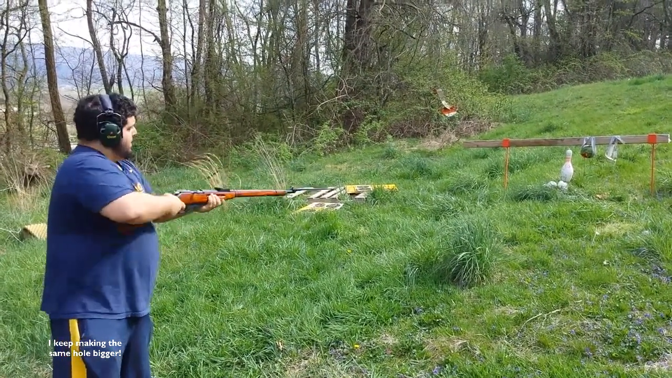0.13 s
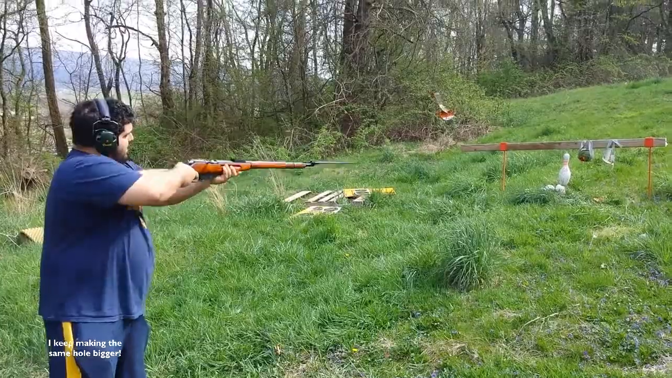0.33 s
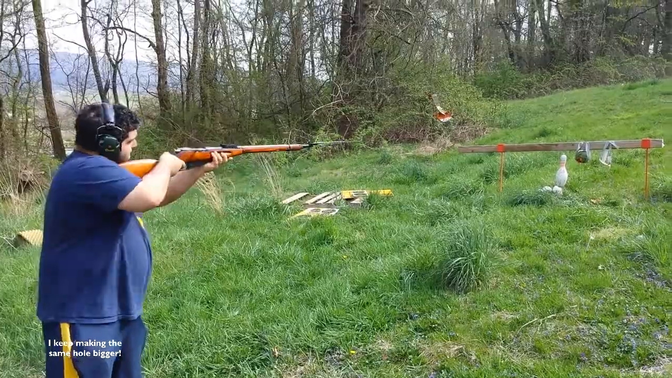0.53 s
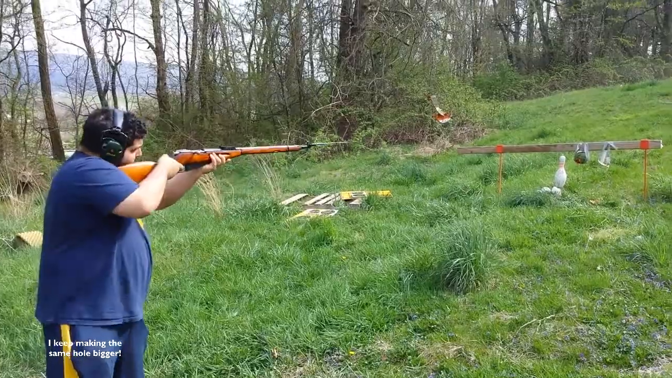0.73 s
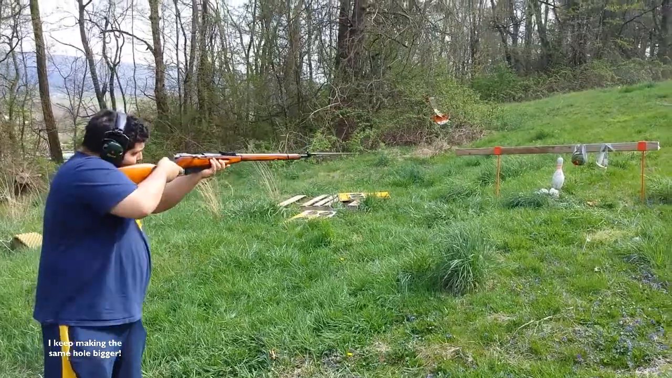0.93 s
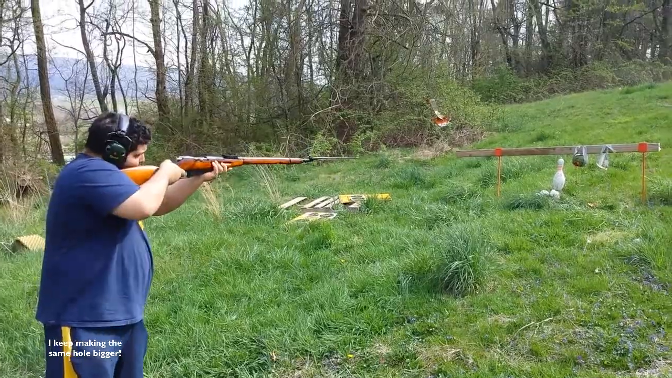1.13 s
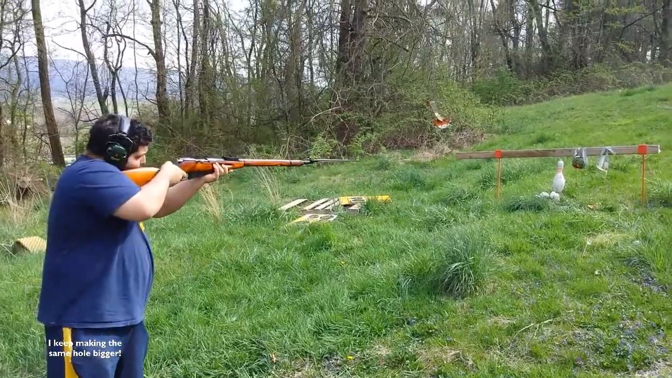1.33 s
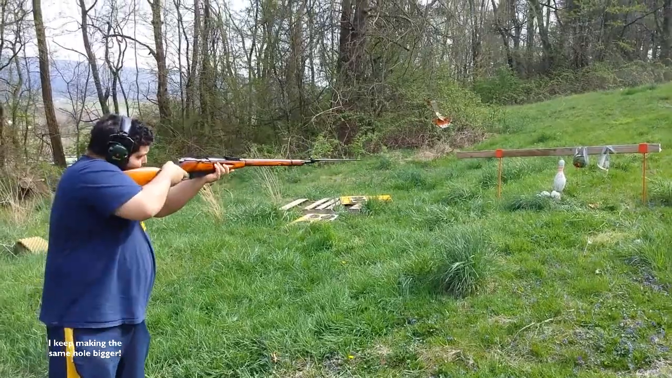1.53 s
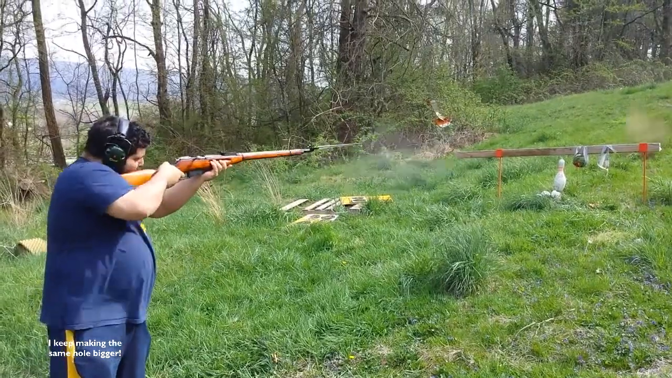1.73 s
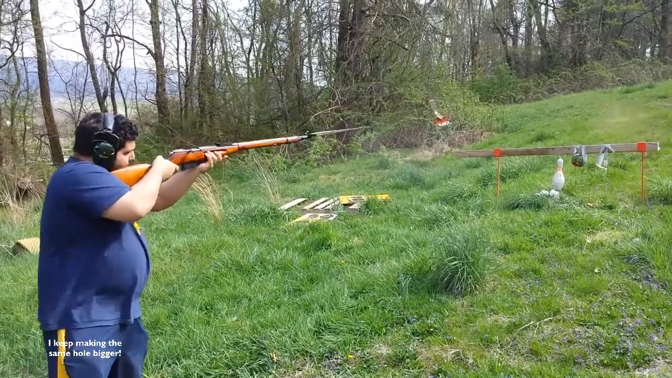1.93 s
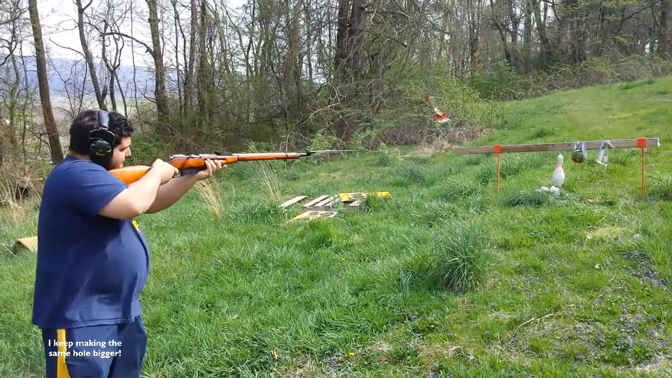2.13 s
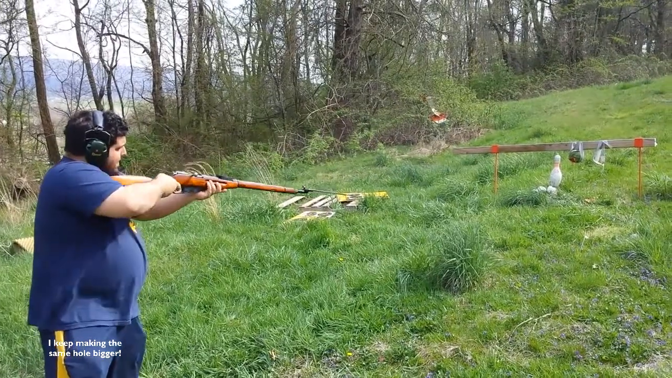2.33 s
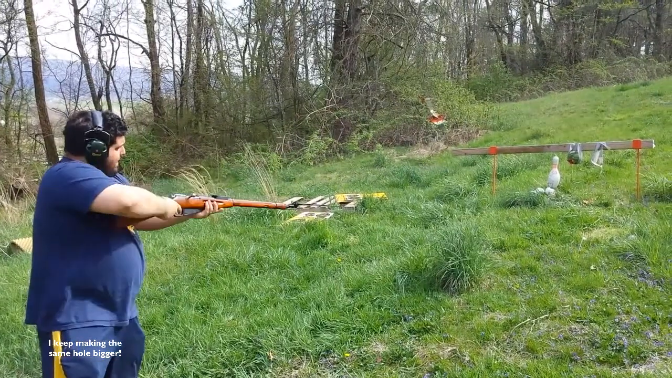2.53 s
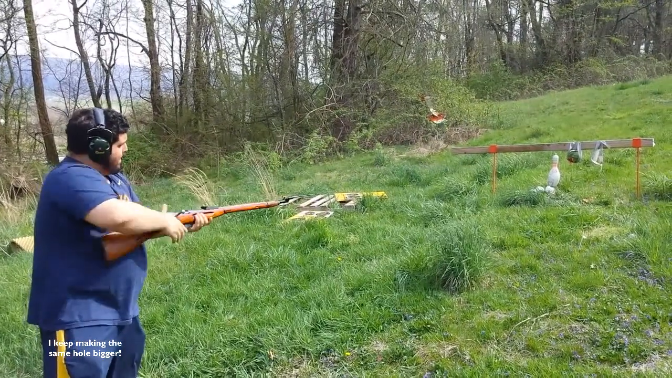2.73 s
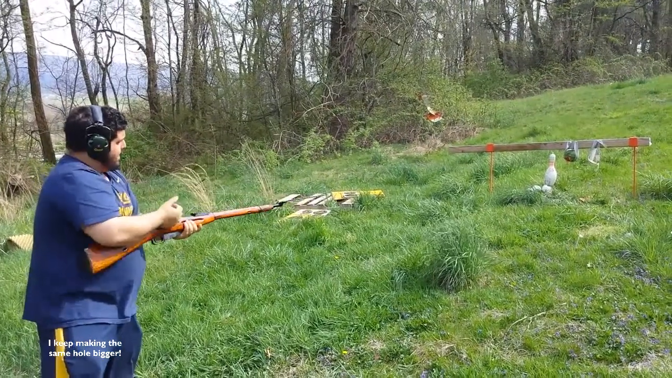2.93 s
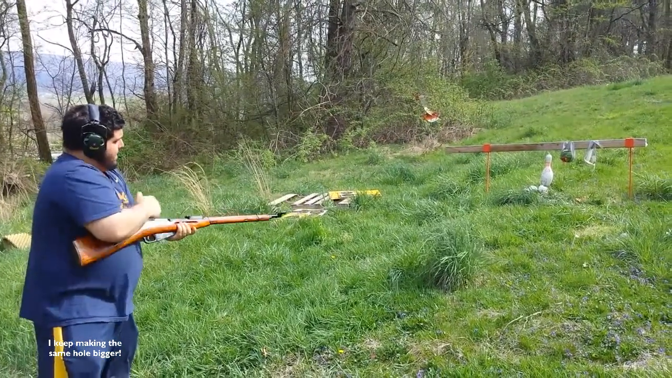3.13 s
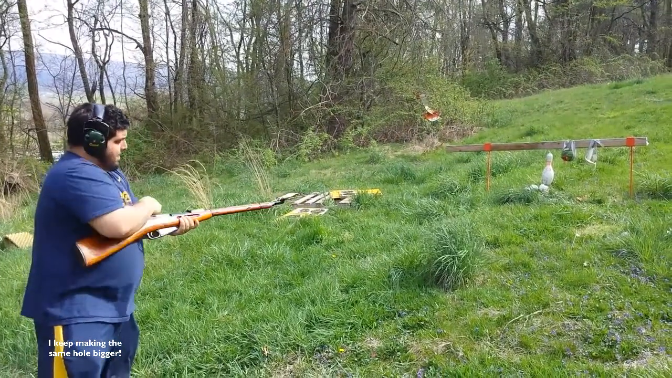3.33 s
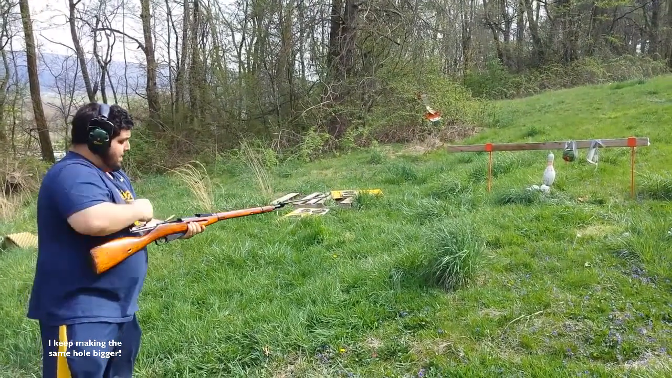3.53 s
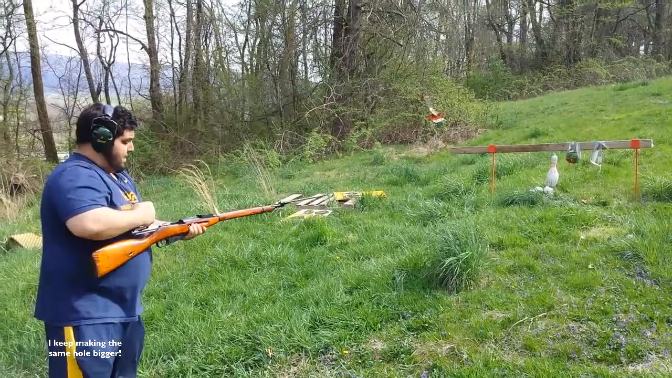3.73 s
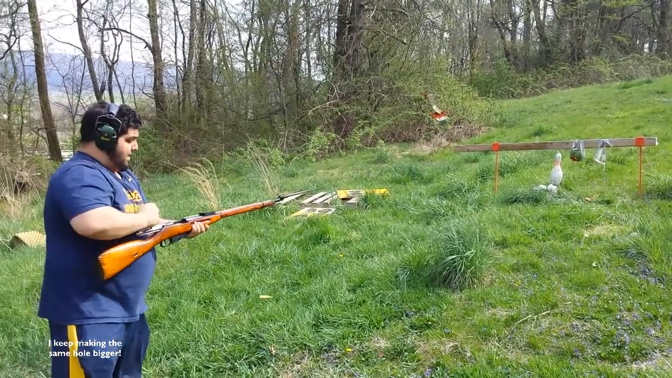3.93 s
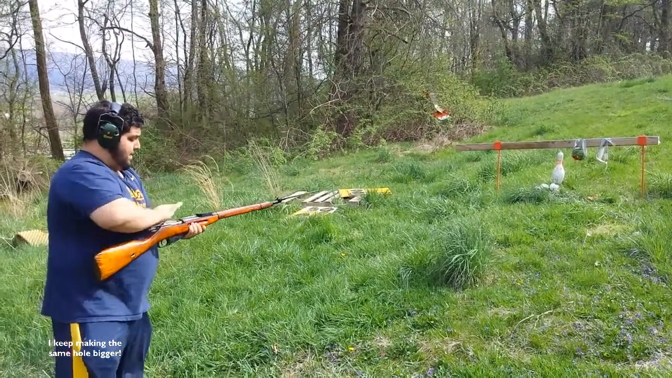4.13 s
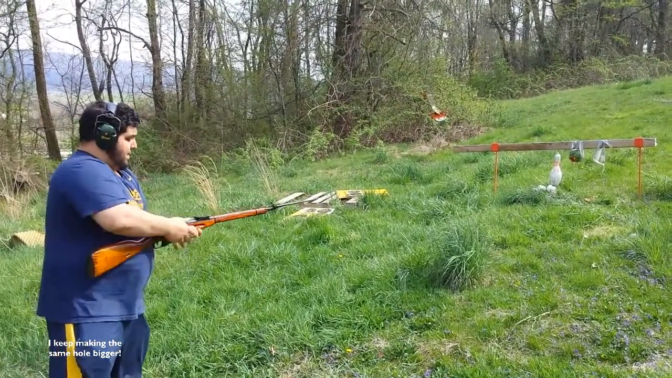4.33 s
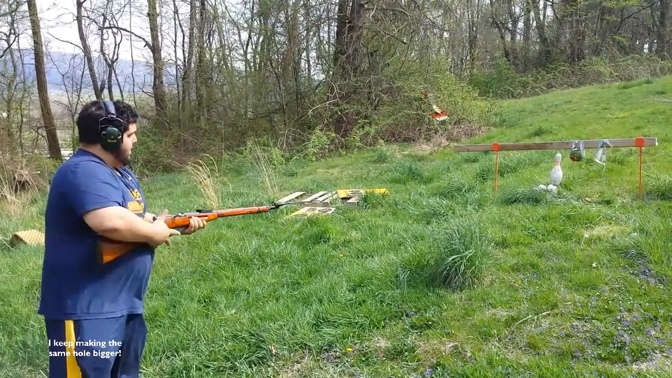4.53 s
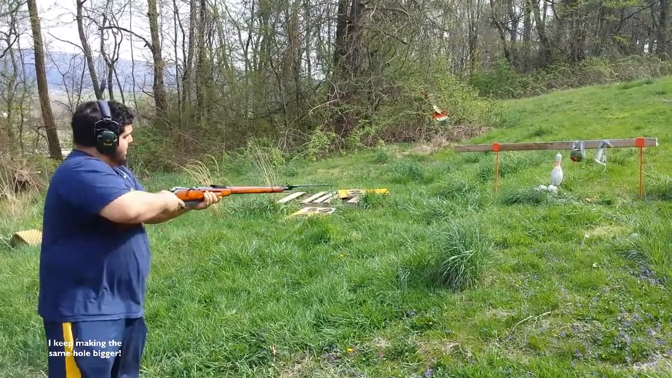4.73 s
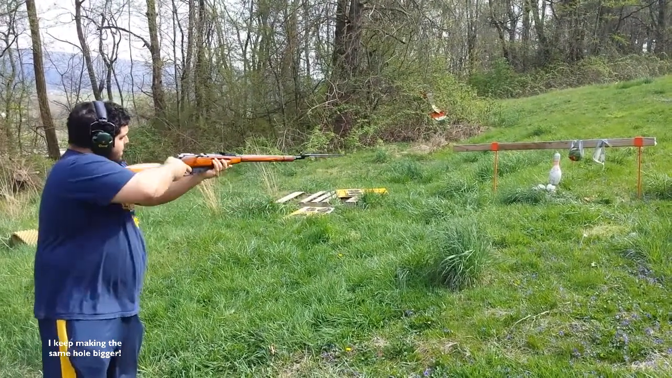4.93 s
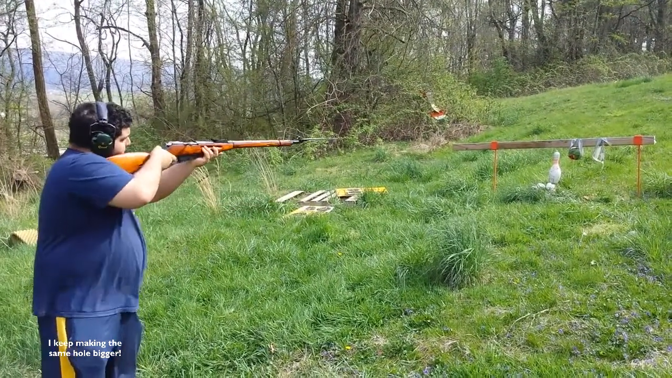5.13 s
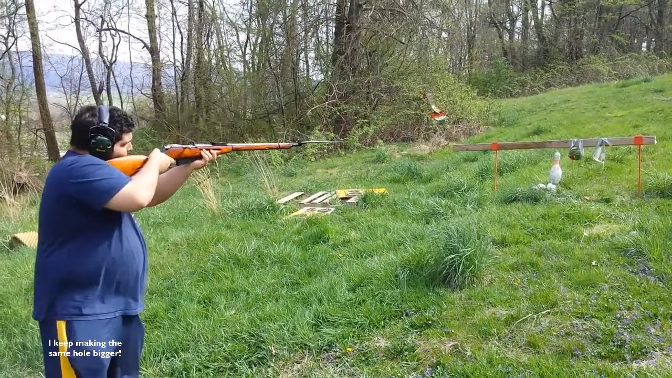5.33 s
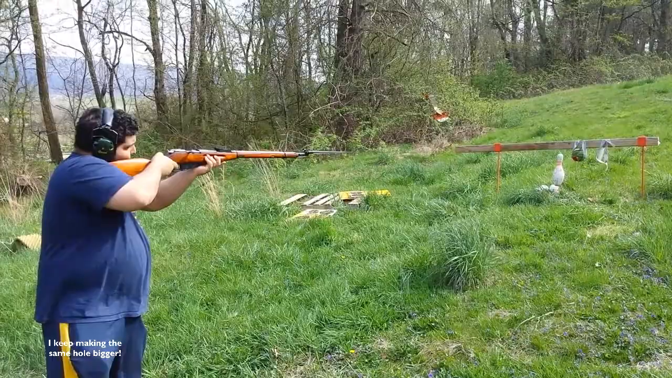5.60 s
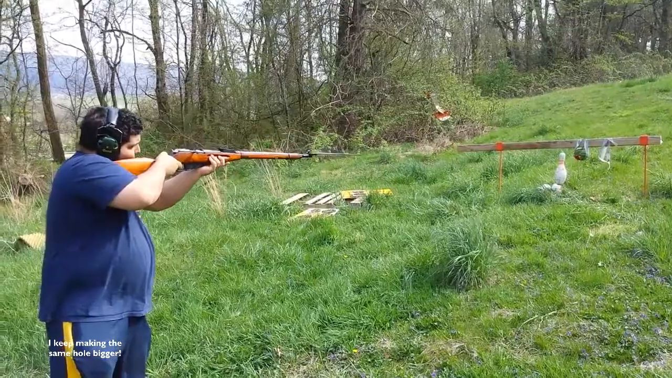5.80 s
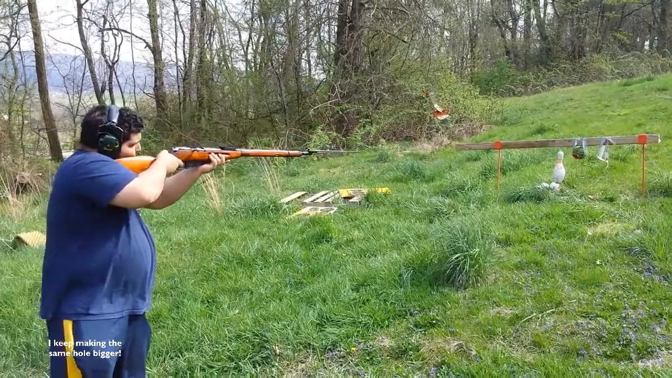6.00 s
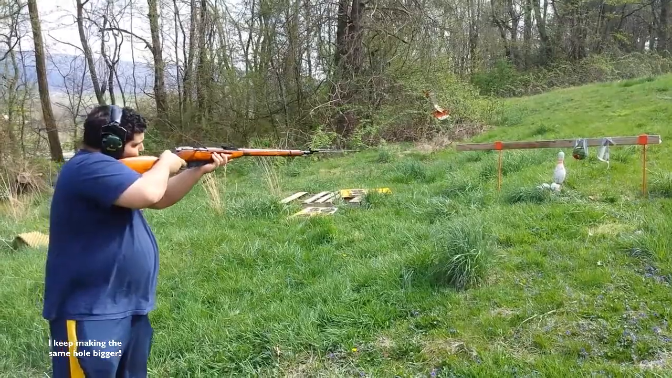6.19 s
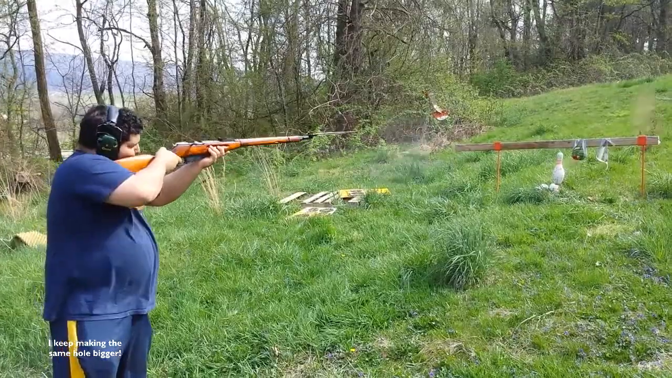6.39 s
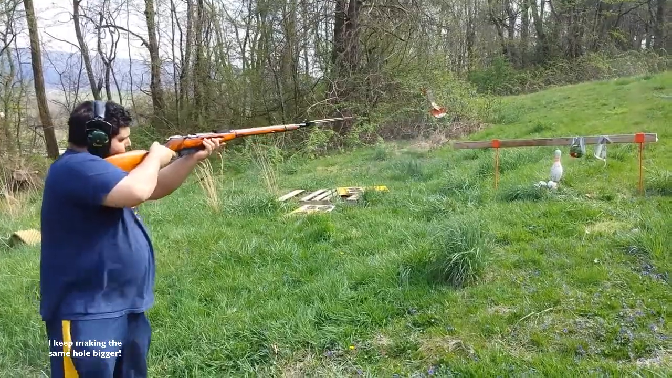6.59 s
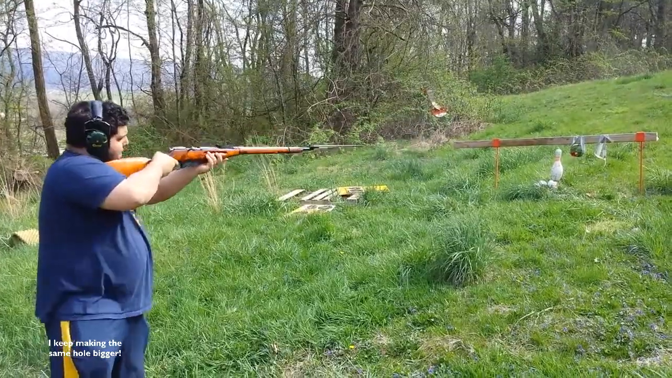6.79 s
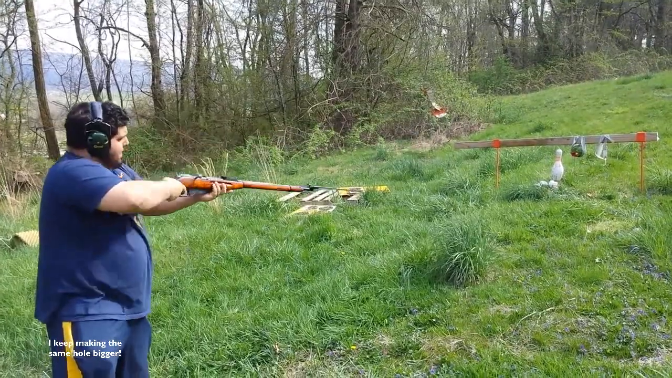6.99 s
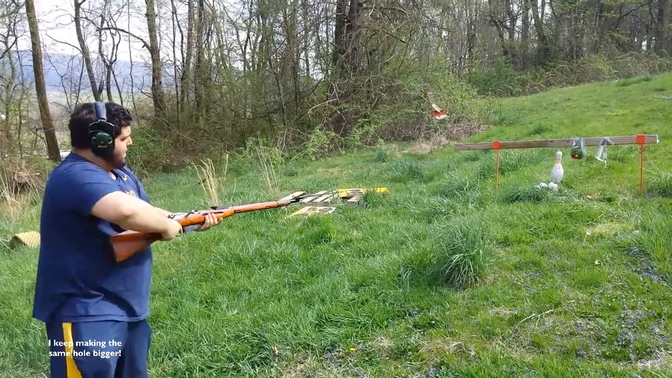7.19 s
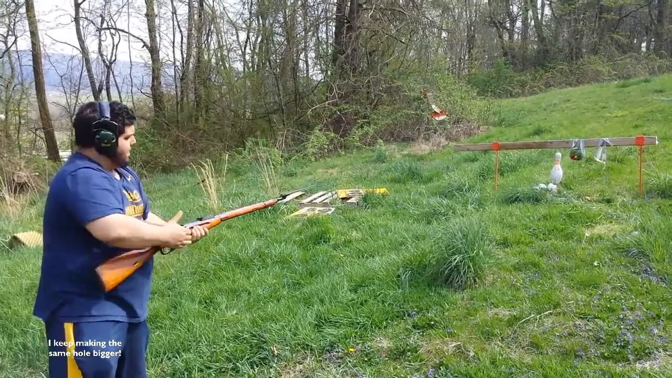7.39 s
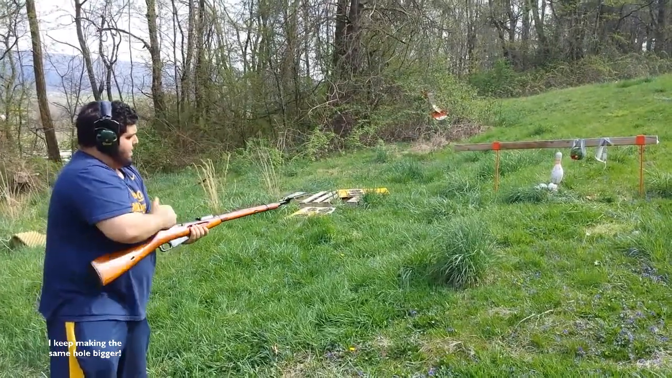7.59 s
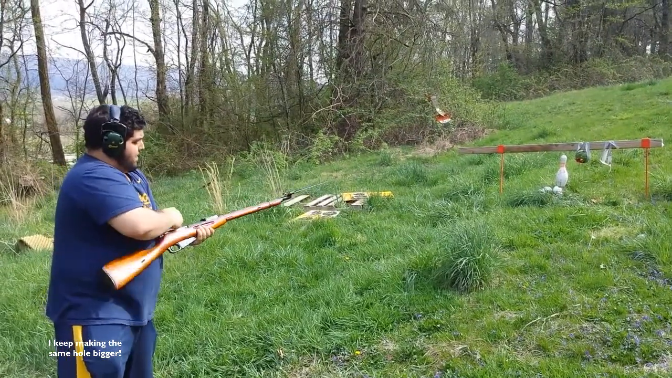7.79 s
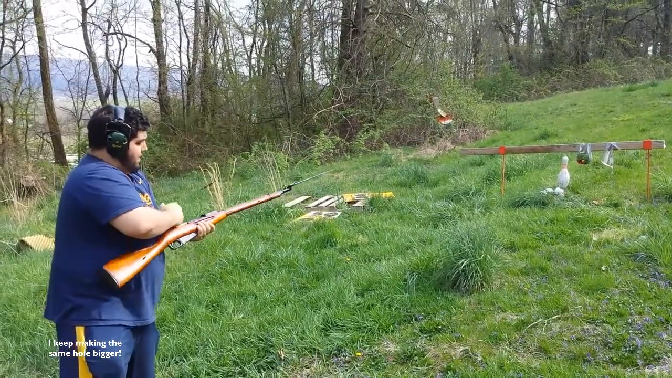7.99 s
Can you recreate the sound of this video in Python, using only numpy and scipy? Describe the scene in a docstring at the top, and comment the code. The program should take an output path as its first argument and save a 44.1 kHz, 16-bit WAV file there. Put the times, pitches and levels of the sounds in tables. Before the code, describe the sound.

A phone near the shooter picks up a dim outdoor hush and tiny birds, then a sudden overloaded gunshot, its echo knocking back from tree trunks and fading. The background is pushed down and slowly returns. Steel clacks and short scrapes of the bolt come in two quick groups, with faint ringing of an empty case and low gusts of wind. After a calm pause, another shot bursts and reverberates, then soft handling clicks and a cloth rub.

```python
"""Two rifle shots beside a wood

Two shots from a bolt-action rifle ring out on a meadow, a few metres from a phone.
Each blast is shaped noise with a low thump; decaying noise and knocks bring it back from the trees.
Steel blows and scrapes are the bolt, ringing sines the spent brass case, gliding whistles small birds.
Noise makes the distant hush and rush, and the wind that buffets the microphone.
The phone's gain sinks at loud sounds and slowly returns; its limiter flattens the blasts."""
import sys
import numpy as np
from scipy import signal
from scipy.fft import rfft, irfft, next_fast_len
from scipy.io import wavfile
from scipy.ndimage import uniform_filter1d, minimum_filter1d

SR = 44100
rng = np.random.default_rng(int(sys.argv[2]) if len(sys.argv) > 2 else 0)


def wav_record(signal):
    """Record a signal, one row per channel, as 16-bit PCM in the file named by sys.argv[1]."""
    frames = np.transpose(np.atleast_2d(signal))
    bounded = np.clip(frames, -1, 1)
    # unit amplitude maps onto the largest positive 16-bit level
    quanta = np.round(bounded * 32767).astype(np.int16)
    wavfile.write(sys.argv[1], SR, quanta)


N = 353593
TIME = np.arange(N) / SR

# spectrum of metal knocks and scrapes: f/Hz, level/dB
METAL_COLOUR = [(200, -29), (500, -19.5), (750, -7), (1500, -4.5), (2800, 2.5), (4200, 0.5), (6200, 8),
                (8000, 1.5), (11000, -8.5), (15000, -25)]


def undb(db):
    """Decibels to gain."""
    return 10 ** (np.asarray(db) / 20)


def curve(rows, at):
    """Each column of a table, joined by straight lines."""
    x, *columns = np.transpose(rows)
    return [np.interp(at, x, c) for c in columns]


def over_pitch(rows, hz):
    """Each column of a table, joined on a log-frequency axis."""
    log_rows = [(np.log(r[0]), *r[1:]) for r in rows]
    return curve(log_rows, np.log(hz + 1))


def clock(seconds):
    """Sample times of a short sound."""
    return np.arange(int(seconds * SR)) / SR


def add(out, start, sound):
    """Mix a sound in at a time."""
    i = int(start * SR)
    out[:, i:i + sound.shape[-1]] += sound[..., :N - i]


def sides(db):
    """Left and right gains for a level difference."""
    return undb(np.array([db, -db]) / 2)


def colour(x, points, tilt_db=0):
    """Shape white noise to a spectrum, tilted in dB per octave, keeping its power."""
    hz = np.linspace(0, SR / 2, x.shape[-1] // 2 + 1)
    gain = undb(over_pitch(points, hz)[0] + tilt_db * np.log2(hz + 1))
    level = np.sqrt(np.mean(gain ** 2))
    return irfft(rfft(x) * gain / level, x.shape[-1])


def air_noise(size):
    """White noise at the two microphone ports: alike in the bass, unrelated in the treble."""
    # the two ports: f/Hz, left minus right/dB, likeness (0-1)
    port_rows = [(150, 1, .7), (593, 1, 0.6), (1230, 2.5, .05), (2320, 4, 0), (7040, 1.5, 0),
                 (14960, -5.5, 0)]
    mid, side = rfft(rng.standard_normal((2, size)))
    pan_db, alike = over_pitch(port_rows, np.linspace(0, SR / 2, len(mid)))
    alike = np.clip(alike, -.99, .99)
    mid = mid * np.sqrt((1 + alike) / 2)
    side = side * np.sqrt((1 - alike) / 2)
    return irfft(np.array([mid + side, mid - side]) * sides(pan_db), size)


def walk(size, rate):
    """Random values, `rate` a second, joined by straight lines, with a spread near 1."""
    at = np.arange(size) / SR * rate
    steps = rng.standard_normal(size // 16 + 2)
    # straight lines between the values lose a third of the power
    return np.interp(at, np.arange(len(steps)), steps) * np.sqrt(3 / 2)


def fade(t, t60):
    """Exponential decay, down 60 dB after t60 seconds."""
    return np.exp(-np.log(1000) * t / t60)


def ring(modes, t, scatter_db):
    """Struck modes; each blow and each port gets its own share of them."""
    total = 0
    for hz, db, t60 in modes:
        share = undb(db + scatter_db * rng.standard_normal((2, 1)))
        phase = rng.random((2, 1))
        total = total + share * fade(t, t60) * np.sin(2 * np.pi * (hz * t + phase))
    return total


def distant(levels, spectrum, waver_db=1.67):
    """Far-off shaped noise from the valley: slow swells with a slight random waver."""
    far_noise = colour(air_noise(next_fast_len(N)), spectrum)[:, :N]
    return far_noise * undb(curve(levels, TIME)[0] + waver_db * walk(N, 14))


def wind(buffet_db=2.5, eddy_db=-9, eddy_growth=0.7):
    """Eddies buffet each port on its own; strong gusts add smaller, higher ones."""
    # gusts: t/s, level/dB, left minus right/dB
    gusts = [(0, -71, -2), (.42, -71, 2), (.53, -42.5, -15), (.7, -63, 14), (1.1, -53, 1), (1.55, -50.5, 1),
             (2.8, -67, 2), (3.0, -28.5, 14), (3.3, -27.5, 14.5), (3.45, -38.5, -1.5), (4.05, -29.5, 1.5),
             (4.25, -30.5, -3.5), (4.7, -26.5, -11), (5.1, -35, -8.5), (5.6, -40.5, 4), (6.0, -46.5, 7),
             (7.2, -63.5, -0.5), (8.02, -60, 0)]
    # rumble of the large eddies: f/Hz, level/dB
    rumble_colour = [(20, -18.5), (60, -2.5), (105, 2), (160, -4), (250, -22), (500, -33), (1500, -63)]
    db, pan_db = curve(gusts, TIME)
    large, small = rng.standard_normal((2, 2, next_fast_len(N)))
    rumble = colour(large, rumble_colour)[:, :N]
    # small eddies sound an octave higher
    flutter = colour(small, [(2 * hz, level) for hz, level in rumble_colour])[:, :N]
    flutter = flutter * undb(eddy_db + eddy_growth * (db - db.max()))
    return (rumble + flutter) * sides(pan_db) * undb(db + buffet_db * walk(N, 22))


def birds(buzz_hz=170):
    """Thin gliding whistles; a fast, deep flutter of pitch turns some into a buzz."""
    # calls: t/s, length/s, start f/Hz, end f/Hz, level/dB, flutter depth/Hz
    calls = [(.10, 0.04, 5640, 7700, -45, 3), (1.185, 0.093, 9050, 7850, -64.5, -3),
             (2.844, .05, 6600, 7500, -51.5, 3), (5.678, 0.036, 3760, 3740, -50.5, -1),
             (5.681, 0.087, 6550, 6940, -48, 999), (5.768, .025, 4085, 4016, -55, 303),
             (5.935, 0.023, 4105, 3760, -58.5, 200.5), (6.04, 0.052, 5700, 7590, -61, 4)]
    out = np.zeros((2, N))
    for start, length, first_hz, last_hz, db, depth_hz in calls:
        t = clock(.2)
        part = np.minimum(t / length, 1)
        flutter = np.sin(2 * np.pi * buzz_hz * t + 2.3 * walk(len(t), 500))
        # the glide is fastest at first
        hz = first_hz + (last_hz - first_hz) * part ** .65 + depth_hz * flutter
        swell = np.sqrt(2 * np.abs(np.sin(np.pi * part)))
        add(out, start, undb(db) * swell * np.sin(2 * np.pi * np.cumsum(hz) / SR))
    return out


def steel_blow(tilt_db, ring_db=-8, spot_t60=.0035):
    """Steel strikes steel: a dense clack, a weaker rattle of loose parts and a thin ring."""
    # modes of the action: f/Hz, level/dB, t60/s
    steel_modes = [(2750, -19, 0.042), (3100, -27, 0.16), (3730, -18.5, 0.11), (6600, -23.5, 0.24),
                   (6370, -31, 0.17), (10100, -27, .13)]
    clack_t60_s, rattle_db, rattle_t60_s = 0.034, -19, 0.14
    t = clock(1 / 5)
    envelope = fade(t, clack_t60_s) + undb(rattle_db) * fade(t, rattle_t60_s)
    chatter = colour(air_noise(len(t)), METAL_COLOUR, tilt_db) * envelope
    # brief resonances of the struck spot
    spot = rng.standard_normal(len(t)) * fade(t, spot_t60)
    spot = spot[None] / np.linalg.norm(spot)
    clack = signal.fftconvolve(chatter, spot, axes=1)[:, :len(t)]
    onset = 1 - fade(t, 0.0058)
    return (clack + undb(ring_db) * ring(steel_modes, t, scatter_db=2.5)) * onset


def bolt(grit_db=3.0, grit_rate=500):
    """The bolt knocks against its stops; its scrapes along the track are gritty noise."""
    # blows of the bolt and action: t/s, level/dB, brightness/(dB per octave)
    blows = [(.362, -42, 0), (2.984, -34, -1), (3.002, -34, 0), (3.0315, -6, -1), (3.062, 1, 1.5),
             (3.084, -16, 0), (3.111, -26, 3), (3.347, -26, 0), (3.369, -8, -.5), (3.4083, -1, -1),
             (3.415, -6, -1), (3.4295, -2, -1.2), (3.4403, 7.5, 1.5), (3.956, -32, 0), (3.991, -21, 2),
             (4.083, 2, -.3), (4.1835, -10, 1.5), (4.1972, -1, -1), (4.968, -37, 0), (5.118, -38, 0),
             (7.3935, -26, -.5), (7.492, -33, 0), (7.5025, -15.5, -2.3), (7.953, -32, 0),
             (7.986, -21, -2.5)]
    # scrapes along the track: start t/s, end t/s, start level/dB, end level/dB
    scrapes = [(3.387, 3.398, -19, -17.5), (3.994, 4.075, -25.5, -13), (4.157, 4.186, -49, -18)]
    out, t = np.zeros((2, N)), clock(1 / 5)
    for start, db, tilt_db in blows:
        add(out, start, undb(db) * steel_blow(tilt_db))
    for start, end, first_db, last_db in scrapes:
        length = end - start
        grip_db = np.interp(t, [0, length, length + 0.02], [first_db, last_db, -77])
        scrape = colour(air_noise(len(t)), METAL_COLOUR)
        add(out, start, scrape * undb(grip_db + grit_db * walk(len(t), grit_rate)))
    return out


def bumps():
    """Dull bumps far off, and at the end a soft low rub of cloth: narrow noise bands, bell-shaped in time."""
    # far bumps, and last the cloth rub: peak t/s, half length/s, centre f/Hz, level/dB
    soft_bursts = [(.645, .04, 600, -44.5), (1.112, 0.0078, 890, -41.5), (1.335, .018, 910, -45),
                   (1.456, 0.011, 824, -42), (1.565, .025, 601.4, -41.5), (5.89, .035, 630, -44.5),
                   (7.8, 0.2, 378, -48)]
    out, t = np.zeros((2, N)), clock(1)
    middle = t.mean()
    for top, half, hz, db in soft_bursts:
        band = [(hz / 4, -45), (hz / 1.5, -16), (hz, 0), (hz * 1.5, -16), (hz * 5, -50)]
        body = colour(air_noise(len(t)), band)
        add(out, top - middle, body * undb(db) * np.exp(-np.square((t - middle) / half)))
    return out


def wood_scatter(patchy_db=2.0, patch_rate=110):
    """Countless echoes from twigs and trunks; air takes the treble from those that travel far."""
    # scatter from the wood: f/Hz, level at first/dB, decay/(dB per s)
    scatter_rows = [(30, -34, 52), (90, -6, 33), (172, 1, 36), (269.8, -7.5, 39.5), (414, 2, 37),
                    (653, 12, 25.5), (790, -2.5, 40.5), (950, -2, 37), (1200, 0, 31.5), (2960, -1.5, 39.5),
                    (6430, 5, 64.5), (9700, -0.5, 89.5), (15000, -14, 140)]
    # echo delays: the first trees are reached, then a weaker answer from beyond the far edge
    near_s, far_s, edge_s, beyond_db = 0.036, 0.51, 0.2, -10.5
    t = clock(1.8)
    hz, delay, z = signal.stft(air_noise(len(t)), SR, nperseg=256)
    start_db, decay = (c[:, None] for c in over_pitch(scatter_rows, hz))
    # long waves bounce only off the few thick trunks, so they come back in lumps
    lumps = np.interp(delay, t, walk(len(t), patch_rate)) / (1 + hz[:, None] / 3500)
    beyond = (1 + np.tanh((delay - far_s) / edge_s)) / 2
    db = start_db - decay * delay + beyond_db * beyond + patchy_db * lumps
    return signal.istft(z * undb(db), SR)[1][:, :len(t)] * np.minimum(t / near_s, 1)


def trunk_echo(body_hz=640, t60=0.052, splinter_db=-1, knock_db=-8):
    """The pressure pulse thrown back by one trunk: a dull, brief knock with a splintered edge."""
    t = clock(0.06)
    hz = body_hz * np.exp(0.058 * rng.standard_normal())
    knock = np.sin(2 * np.pi * hz * t) * np.exp(-np.square((t - .003) / 0.0031))
    splinter_colour = [(100, -6.0), (700, 0.5), (1600, -6.0), (3500, -22.5), (8000, -66)]
    splinters = colour(air_noise(len(t)), splinter_colour) * fade(t, t60) * (1 - fade(t, 0.037))
    return undb(knock_db) * knock + undb(splinter_db) * splinters


def shots(trunk_db=8.0, thump_db=8, thump_hz=130, thump_delay=0.029, thump_s=.003):
    """The firing pin, the muzzle blast, a low thump as its pressure lets go, and the wood's answer."""
    # shots: t/s, blast level/dB, echo level/dB
    firings = [(1.5983, 18, 7.5), (6.2440, 17.5, 7)]
    # spectrum of the blast: f/Hz, level/dB
    blast_colour = [(25, -10), (150, 0.5), (400, -1), (1000, -4), (2500, -0.5), (4800, -1.5), (6200, 7),
                    (7600, 0.5), (11000, -6.5), (15000, -13.5)]
    # echoes from big trunks and the slope: t after the shot/s, level relative to each other/dB
    trunk_rows = [(.093, -3), (.104, -9.5), (.111, -15), (.188, -10.5), (.226, -10.5), (.352, -20.5),
                  (.420, -30), (0.443, -22), (.528, -23), (.615, -34)]
    # the blast swells, holds and dies away
    attack_s, hold_s, blast_t60_s = .004, .032, 0.034
    # the firing pin falls just before each shot
    pin_lead_s, pin_db = 0.0036, -24
    out, t = np.zeros((2, N)), clock(0.25)
    envelope = np.minimum(t / attack_s, 1) * fade(np.maximum(t - hold_s, 0), blast_t60_s)
    for start, blast_db, echo_db in firings:
        blast = colour(air_noise(len(t)), blast_colour) * undb(blast_db) * envelope
        late = t - thump_delay
        thump = np.sin(2 * np.pi * thump_hz * late) * np.exp(-(late / thump_s) ** 2)
        add(out, start - pin_lead_s, undb(pin_db) * steel_blow(0))
        add(out, start, blast + undb(thump_db) * thump)
        add(out, start, undb(echo_db) * wood_scatter())
        for delay, db in trunk_rows:
            add(out, start + delay, undb(echo_db + trunk_db + db) * trunk_echo())
    return out


def rubs(catch_db=1.0, catch_rate=120):
    """Skin and cloth slide over the wooden stock, catching a little as they go."""
    # hand and sleeve as the bolt is drawn back and the rifle shouldered: t/s, length/s, level/dB
    strokes = [(2.961, .42, -38.5), (5.094, .2, -48.5)]
    out = np.zeros((2, N))
    for start, length, db in strokes:
        size = len(clock(length))
        rub_colour = [(600, 4), (1600, 2), (2250, 3.5), (2800, -6.5), (9000, -18.5)]
        rub = colour(air_noise(size), rub_colour)
        catching = undb(db + catch_db * walk(size, catch_rate))
        # the low power leaves a flat top with quick ends
        add(out, start, rub * catching * np.hanning(size) ** 0.098)
    return out


def spent_case(tick_db=-1):
    """The empty brass case ticks and rings as it is thrown out and when it is knocked again."""
    # knocks: t/s, level/dB
    knocks = [(3.4413, -17), (4.378, -25), (4.467, -26)]
    # modes of the case: f/Hz, level/dB, t60/s
    brass_modes = [(6540, -8.5, 0.16), (9400, -2, 0.15), (13120, -12, 0.2), (14950, -5, 0.11)]
    out, t = np.zeros((2, N)), clock(1 / 2)
    for start, db in knocks:
        tick = colour(air_noise(len(t)), METAL_COLOUR) * fade(t, 0.0094)
        add(out, start, undb(db) * (ring(brass_modes, t, scatter_db=-4.5) + undb(tick_db) * tick))
    return out


def scene(wet_db=-20.0, near_t60=0.89):
    """The whole meadow; the small sounds get a faint answer from the same kind of wood as the shots."""
    # distant hush: t/s, level/dB
    hush_levels = [(0, -48), (1.5, -44.5), (4, -44.5), (6.1, -49), (8.02, -41.5)]
    # its spectrum: f/Hz, level/dB
    hush_colour = [(40, 0), (100, 7), (220, -6.5), (450, -6.5), (800, -2), (1400, -4.5), (2300, -7.5),
                   (2800, -14), (5000, -16.5), (6600, -14), (8200, -22), (15000, -30)]
    # broad far-off rush: t/s, level/dB
    rush_levels = [(0, -57), (1.5, -49.5), (3.5, -59.5), (7, -57.5), (8.02, -53.5)]
    # its spectrum: f/Hz, level/dB
    rush_colour = [(150, -22), (450, -14), (850, 0.5), (1900, -7), (3200, -18), (8000, -44)]
    valley = distant(hush_levels, hush_colour) + distant(rush_levels, rush_colour)
    small = birds() + bolt() + rubs() + spent_case()
    wood = colour(wood_scatter(), [(300, 8.5), (6000, -2.5), (11000, 7.5)])
    wood = wood * fade(TIME[:wood.shape[1]], near_t60)  # the nearest trees count most
    wood = wood / np.sqrt(np.sum(wood ** 2) / 2)
    echo = signal.fftconvolve(small, wood, axes=1)[:, :N]
    return valley + wind() + small + undb(wet_db) * echo + bumps() + shots()


def gain_control(x, deaf_below_hz=500):
    """Gain that starts low, drops for loud sounds and creeps back in quiet; rumble barely moves it."""
    threshold_db, max_cut_db, recover_db_per_s = -24, 13, 15.5
    detect_s, hold_s = .08, 0.5
    window, hold = int(detect_s * SR), int(hold_s * SR)
    highpass = signal.butter(2, deaf_below_hz, "high", fs=SR, output="sos")
    heard = signal.sosfilt(highpass, x)
    # both windows look only backwards in time
    power = uniform_filter1d(np.mean(heard ** 2, axis=0), window, origin=(window - 1) // 2)
    level_db = 10 * np.log10(np.abs(power) + 1e-12)
    cut_db = np.clip(level_db - threshold_db, 0, max_cut_db)
    quiet = minimum_filter1d(1. * (cut_db == 0), hold, origin=(hold - 1) // 2)
    recovered_db = recover_db_per_s * np.cumsum(quiet) / SR
    # the deepest cut so far holds until recovery has caught up with it
    deepest_db = np.maximum.accumulate(np.maximum(cut_db + recovered_db, max_cut_db))
    return undb(recovered_db - deepest_db)


def record(dry, ceiling=0.79):
    """The phone rides its gain, flattens the blasts with soft clipping and cuts the top."""
    top_hz = 15450
    ridden = dry * gain_control(dry)
    flattened = ridden / (1 + (ridden / ceiling) ** 4) ** (1 / 4)
    lowpass = signal.ellip(10, .1, 70, top_hz, fs=SR, output="sos")
    return signal.sosfilt(lowpass, flattened)


dry = scene()
out = record(dry)
wav_record(out)
```